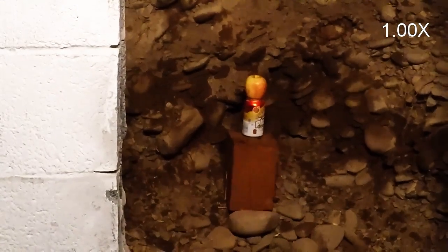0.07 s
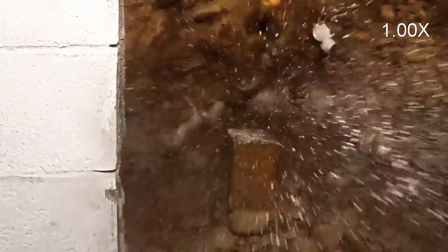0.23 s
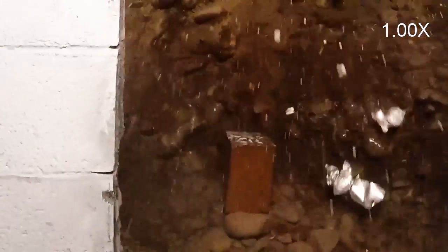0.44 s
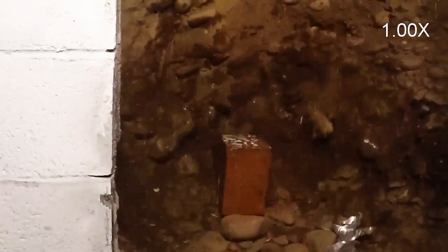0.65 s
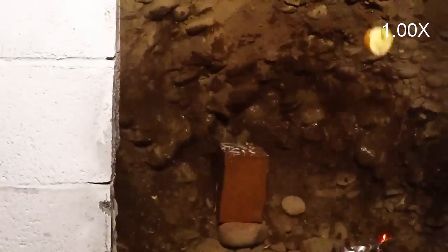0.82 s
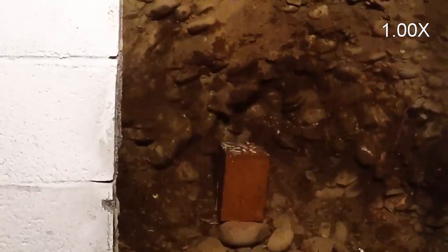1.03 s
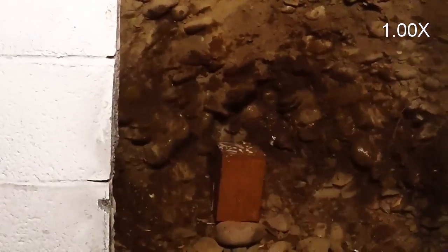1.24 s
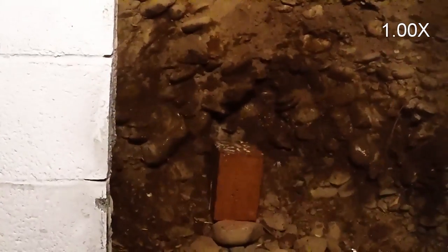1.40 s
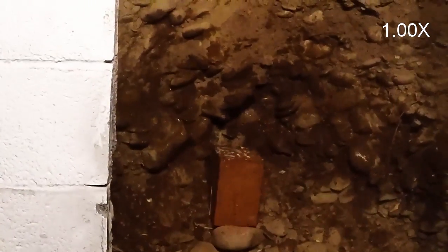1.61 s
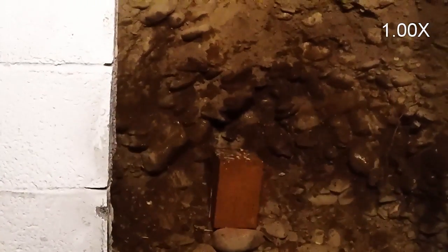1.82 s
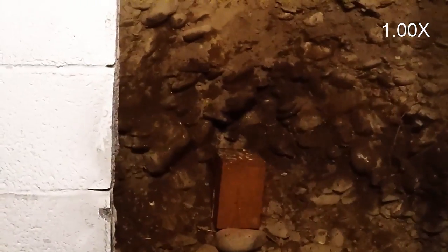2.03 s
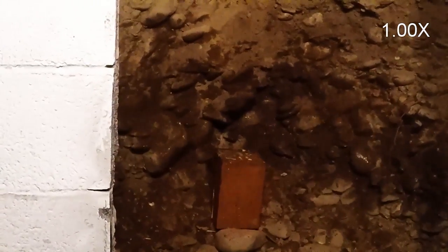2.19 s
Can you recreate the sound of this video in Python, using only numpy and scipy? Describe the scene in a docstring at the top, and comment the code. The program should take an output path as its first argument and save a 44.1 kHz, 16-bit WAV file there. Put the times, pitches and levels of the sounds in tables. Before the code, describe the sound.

One sharp rifle bang overloads the microphone as a drink can bursts with a short hiss beside a dirt bank. After a brief echo, droplets patter, can pieces land with light knocks and clinks, and a faint rush returns.

```python
"""A rifle bullet bursts a drink can in front of a dirt bank beside a block wall. The crack, the muzzle
blast and its reflection overload the microphone and ring between the walls. Then spray patters down,
grit taps and scraps of can knock, ping and clink. The recorder's gain control ducks at the shot and
slowly lets a steady fan-like rush come back."""
import sys
import numpy as np
from scipy import signal
from scipy.fft import rfft, irfft
from scipy.io import wavfile
from scipy.ndimage import uniform_filter1d

SR = 44100
rng = np.random.default_rng(int(sys.argv[2]) if len(sys.argv) > 2 else 0)


def materialize(psi):
    """Save the field psi as 16-bit PCM at rate SR to the path in sys.argv[1].

    A 1-D psi becomes a single channel; in a 2-D psi each row is a channel.
    """
    bounded = np.clip(np.atleast_2d(psi).T, -1, 1)
    quanta = np.round(bounded * 32767).astype(np.int16)
    wavfile.write(sys.argv[1], SR, quanta)


N = 103635


def undb(db):
    """Decibels to gain."""
    return 10 ** (np.asarray(db) / 20)


def since(start):
    """Seconds since a moment."""
    return np.arange(N) / SR - start


def noise():
    """White noise."""
    return rng.standard_normal(N)


def fade(start, t60):
    """Hard attack, then a decay of 60 dB in t60 seconds."""
    t = since(start)
    return (t >= 0) * np.exp(-np.log(1000) * np.maximum(t, 0) / max(t60, 1e-3))


def ring(start, hz, t60):
    """One struck mode."""
    return fade(start, t60) * np.sin(2 * np.pi * hz * since(start))


def colour(x, points, peaks=()):
    """EQ a sound with a curve and narrow resonances; rms 1."""
    hz = np.fft.rfftfreq(N, 1 / SR)
    point_hz, point_db = np.array(points).T
    db = np.interp(np.log(hz + 1), np.log(point_hz), point_db)
    for centre, width, lift in peaks:
        db += lift / (1 + (2 * (hz - centre) / width) ** 2)
    shaped = irfft(rfft(x) * undb(db), N)
    return shaped / np.sqrt(np.mean(shaped ** 2))


def band(x, low_hz, high_hz, order=4):
    """Band-pass that keeps the rms of white noise."""
    sos = signal.butter(order, [low_hz, high_hz], "band", fs=SR, output="sos")
    return signal.sosfilt(sos, x + 1e-18) * np.sqrt(SR / 2 / (high_hz - low_hz))


# Tone of the rush. Each row: frequency in Hz, level in dB.
RUSH_EQ = [(12, -37), (20, -5.5), (49, -6.5), (135, -19), (185, -18), (245, -10.5), (387, -8), (421, -14),
           (540, -3), (796, -11.5), (1050, -11.5), (1640, -15.5), (5090, -24), (15000, -48)]
# Its resonances. Each row: centre in Hz, width in Hz, lift in dB.
RUSH_PEAKS = [(392, 13, 7), (473, 30, 9.5), (539, 7, 10), (584, 6.8, 6.5), (897, 18, 10), (1083, 26, 11),
              (1434, 7.3, 9.5), (1612, 11, 15), (2300, 18, 7.5)]
def rush():
    """A steady, fan-like bed of dark noise with narrow resonances."""
    return undb(-42) * colour(noise(), RUSH_EQ, RUSH_PEAKS)


CRACK_S, BLAST_S, REFLECTION_S = .2047, .2122, .2165
# Crack, muzzle blast and reflection. Each row: start in seconds, peak in dB, length in seconds.
SHOCK_WAVES = [(CRACK_S, 32, 0.00045), (BLAST_S, 37, 0.0038), (REFLECTION_S, 46, .0058)]
def rifle_shot():
    """Each shock is an N-shaped wave: pressure jumps, ramps down through zero and snaps back."""
    out = np.zeros(N)
    for start, db, length in SHOCK_WAVES:
        progress = since(start) / length
        out += undb(db) * (1 - 2 * progress) * ((progress >= 0) & (progress < 1))
    return out


TOP_HZ = 15300  # top of the hiss and of the final mix
# Tone of the bursting can. Each row: frequency in Hz, level in dB.
BURST_EQ = [(35, -38), (60, -6.5), (276, -6.5), (1180, -8), (2360, -18.5), (2980, -5.5), (3500, -14.5),
            (7000, -18), (15000, -26.5)]
def can_burst():
    """The can tears open with a short roar and its contents hiss out."""
    roar = undb(25.5) * fade(.205, t60=.09) * colour(noise(), BURST_EQ)
    hiss = undb(17) * fade(.2098, t60=.08) * band(noise(), 3970, TOP_HZ, order=2)
    return roar + hiss


# Reverb of the shot by octave. Each row: centre in Hz, level in dB, t60 in seconds.
REVERB_BANDS = [(30, 1, 0.46), (61, 13.5, 0.39), (126, 14.5, .35), (248, 20, 0.31), (480, 20.5, 0.27),
                (916, 9.5, 0.32), (1930, 12, .31), (3870, 14, .29), (6954, 10, 0.27), (12500, 1, 0.225)]
# Resonances between the walls. Each row: pitch in Hz, level in dB.
WALL_RESONANCES = [(52, 11.5), (162, 17), (233, 14), (355, 11), (465, 16.5), (575, 4), (742, 3.5),
                   (962, 6.5), (1144, 3.5)]
# Slapback from farther surfaces. Each row: start in seconds, level in dB.
SLAPBACKS = [(0.247, 11), (.286, 7.5), (.305, 6.5)]
def wall_echoes(onset_s=.21, attack_s=.001):
    """The blast dies between wall and bank, treble first, with resonances, dull slaps and a rumble."""
    out = undb(-24.5) * fade(onset_s, t60=2.79) * band(noise(), 30, 177, order=2)  # long low rumble
    for hz, db, t60 in REVERB_BANDS:
        octave = band(noise(), hz / np.sqrt(2), hz * np.sqrt(2), order=3)
        out += undb(db) * fade(onset_s, t60) * octave
    for hz, db in WALL_RESONANCES:
        out += undb(db) * ring(onset_s + rng.random() / hz, hz, t60=.31)
    for start, db in SLAPBACKS:
        out += undb(db) * fade(start, t60=.12) * band(noise(), 85, 520, order=2)
    attack = 1 - np.exp(-np.maximum(since(onset_s), 0) / attack_s)
    return out * attack


# Envelope of the spray. Each row: time in seconds, level in dB.
SPRAY_ENVELOPE = [(.56, -72.5), (0.599, -32.5), (.70, -52.5), (.79, -34.5), (.92, -40.5), (1.15, -42.5),
                  (1.35, -53), (1.7, -49.5), (2.101, -79)]
# Its tone. Each row: frequency in Hz, level in dB.
SPRAY_EQ = [(300, 1), (900, -1), (3000, -3.5), (6000, -10.5), (10000, -13), (15000, -16.5)]
def spray(drops_per_s=6000, low_hz=400, high_hz=15000, t60=.004, spread_db=9.5):
    """Fine drops of many sizes patter on dirt and scraps, each a tiny ring at its own pitch."""
    when, pitch, size = rng.random((int(drops_per_s * N / SR), 3)).T[:, :, None]
    age = np.arange(int(t60 * SR))
    hz = low_hz + pitch * (high_hz - low_hz)
    decay = np.exp(-np.log(1000) * age / len(age))
    drops = undb(spread_db * size) * np.sin(2 * np.pi * hz / SR * age) * decay
    positions = (when * N).astype(int) + age
    patter = np.bincount(positions.ravel(), drops.ravel(), N)[:N]
    level_db = np.interp(since(0), *np.array(SPRAY_ENVELOPE).T)
    return colour(patter, SPRAY_EQ) * undb(level_db)


# Edges of the six tap bands in Hz, low to high.
BAND_EDGES = [330, 1300, 2600, 4000, 7000, 11000, 15500]
# Scraps and grit landing. Each row: start in seconds, six band levels in dB, t60 in seconds,
# click level in dB relative to the rattle.
SCRAP_TAPS = [(.582, -43, -43, -33, -36, -38.5, -43, 0.068, -10),
              (0.6023, -20, -37, -43, -45, -50, -54, 0.031, -7),
              (.648, -26.5, -41, -44, -40, -48, -54, 0.05, -6),
              (.725, -18.5, -18.5, -26.5, -52, -50, -54, 0.071, 7),
              (0.785, -32, -39, -45.5, -41, -49.5, -55.5, 0.066, -10),
              (0.864, -33, -34, -32, -57, -55, -54, 0.0535, -5),
              (0.8931, -38, -29.5, -32, -48, -53, -52, 0.057, -12),
              (.905, -45, -30, -47, -36.5, -39.5, -53, 0.044, -3),
              (.992, -37.5, -48, -51, -39.5, -43, -48.5, 0.041, -7),
              (1.031, -35, -36, -36, -62, -42, -44, 0.081, -2),
              (1.056, -22, -39, -31, -24, -23.5, -37, 0.058, -6),
              (1.0642, -22, -29, -46, -35, -26.5, -37, 0.045, -9),
              (1.074, -30, -24.5, -32, -38, -48, -52, 0.088, 5),
              (1.148, -39.5, -55, -47, -43, -43.5, -51, 0.13, -10),
              (1.345, -36, -27.5, -32.5, -46, -61, -60, 0.021, 11),
              (1.353, -53.5, -28, -43, -45, -66, -53, 0.029, 0),
              (1.516, -50, -51, -57, -43, -38, -48, 0.035, -5),
              (1.522, -45, -42, -40, -36, -32, -33.5, 0.032, -3),
              (1.599, -61, -48, -41.5, -40.5, -48, -53, 0.049, -7),
              (1.6765, -56, -50, -33.5, -38.5, -47, -55, 0.024, 9),
              (1.827, -56, -45, -49, -45, -44.5, -52, 0.057, -5),
              (1.882, -51, -53, -59, -49, -46, -56, 0.053, -2)]
def scraps():
    """Each piece lands with a click and a brief rattle."""
    drive = np.zeros((len(BAND_EDGES) - 1, N))
    for start, *band_dbs, t60, click_db in SCRAP_TAPS:
        click = undb(click_db) * fade(start, t60=.001)
        tap = noise() * (click + fade(start, t60))
        drive += undb(band_dbs)[:, None] * tap
    return sum(band(x, low, high) for x, low, high in zip(drive, BAND_EDGES, BAND_EDGES[1:]))


# Lumps landing. Each row: start in seconds, level in dB, pitch in Hz.
LUMP_THUDS = [(.652, -12, 156), (0.771, -12.5, 171.5), (1.058, -15, 89)]
def lumps():
    """Soft lumps thud, each one low, heavily damped mode."""
    return sum(undb(db) * ring(start, hz, t60=.03) for start, db, hz in LUMP_THUDS)


def clank(start, hz, t60, width_hz=70):
    """One struck mode of crumpled metal, which never holds a pitch."""
    wander = np.cumsum(noise()) * np.sqrt(2 * np.pi * width_hz / SR)
    return fade(start, t60) * np.sin(2 * np.pi * hz * since(start) + wander)


# Knocks of a large piece of can. Each row: start in seconds, level in dB.
KNOCK_HITS = [(.7252, -24.5), (.7605, -34), (0.7831, -33.5)]
# Its hollow modes. Each row: pitch in Hz, relative level in dB, t60 in seconds.
HOLLOW_MODES = [(886, -2.5, 0.11), (1168, -6, 0.073), (1507, -1.5, 0.042), (1870, 1, 0.076),
                (2230, -2, 0.07), (2590, -4, .05), (3430, -6, .06)]
def can_knocks():
    """A large piece of can lands hollowly and rocks to rest."""
    return sum(undb(db + mode_db) * clank(start, hz, t60)
               for start, db in KNOCK_HITS for hz, mode_db, t60 in HOLLOW_MODES)


# Touches on a small piece of metal. Each row: start in seconds, level in dB.
PING_HITS = [(1.147, -55), (1.259, -51), (1.301, -53)]
# Its modes. Each row: pitch in Hz, relative level in dB.
SHARD_MODES = [(3338, -1), (4344, -3), (5200, -1.5), (6896, -7), (11143, -21)]
def shard_pings():
    """Light touches leave a small piece of metal singing."""
    return sum(undb(db + mode_db) * ring(start + rng.random() / hz, hz, t60=.33)
               for start, db in PING_HITS for hz, mode_db in SHARD_MODES)


# Starts of the three clinks in seconds.
CLINK_STARTS = [1.5222, 1.6763, 1.828]
# Modes of the torn can. Each row: pitch in Hz, then level in dB at each clink.
CLINK_MODES = [(2900, -31.5, -58, -47), (3210, -52, -40, -42), (3440, -62, -39, -53),
               (4200, -31, -41, -43.5), (4570, -38, -37, -55), (5000, -54, -50, -44), (6660, -42, -52, -39),
               (7140, -38, -56, -49), (8250, -31, -64, -54), (11450, -34, -58, -52), (12350, -34, -66, -64)]
def can_clinks():
    """The torn can rings with a different mix of modes on each side it lands on."""
    return sum(undb(db) * clank(start, hz, t60=.055)
               for hz, *dbs in CLINK_MODES for start, db in zip(CLINK_STARTS, dbs))


def scene():
    """Over the rush: the shot, the burst and their echoes, then debris with a short reverb."""
    debris = scraps() + lumps() + can_knocks() + can_clinks() + shard_pings() + spray()
    tail = noise() * fade(.003, t60=.14)
    reverb = undb(-6) * signal.fftconvolve(debris, tail / np.linalg.norm(tail))[:N]
    return (rush() + rifle_shot() + can_burst() + wall_echoes() + debris + reverb)[None]


# Tone of the recorder's own faint rumble. Each row: frequency in Hz, level in dB.
SELF_NOISE_EQ = [(20, 1), (80, -2), (170, -12), (400, -17.5), (2000, -52)]
def record(dry):
    """Gain control ducks at once and recovers slowly; what is still too loud clips; the top is cut."""
    threshold_db, max_cut_db, recover_db_per_s, lookahead_s = -19, 31, 17, .0084
    t = since(0)
    level_db = 20 * np.log10(np.abs(dry[0]) + 1e-9)
    over_db = np.clip(level_db - threshold_db, 0, max_cut_db)
    release_db = recover_db_per_s * t
    cut_db = np.maximum.accumulate(over_db + release_db) - release_db
    early_cut_db = np.interp(t + lookahead_s, t, cut_db)
    gain = undb(-uniform_filter1d(early_cut_db, int(lookahead_s * SR)))
    self_noise = undb(-64) * colour(noise(), SELF_NOISE_EQ)
    clipped = np.clip(dry * gain + self_noise, -1, 1)
    high_cut = signal.ellip(12, .1, 90, TOP_HZ, fs=SR, output="sos")
    return signal.sosfilt(high_cut, clipped)


dry = scene()
out = record(dry)
materialize(out)
```